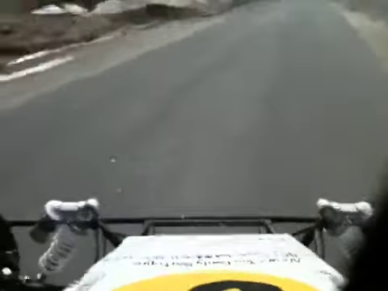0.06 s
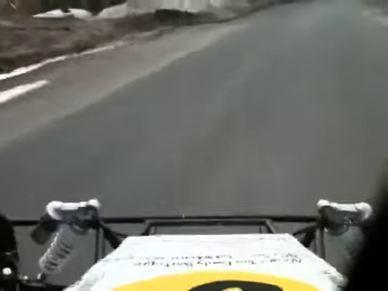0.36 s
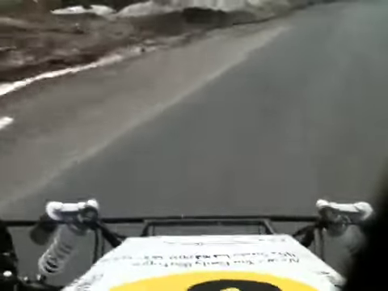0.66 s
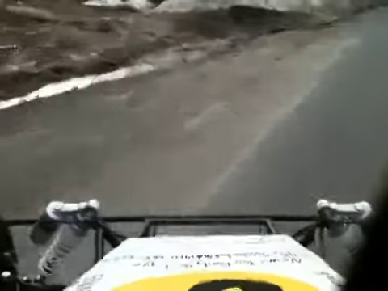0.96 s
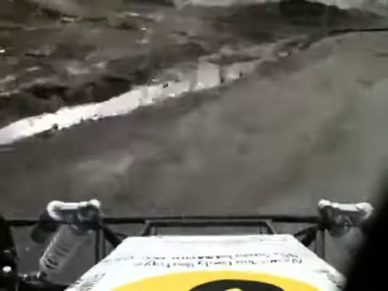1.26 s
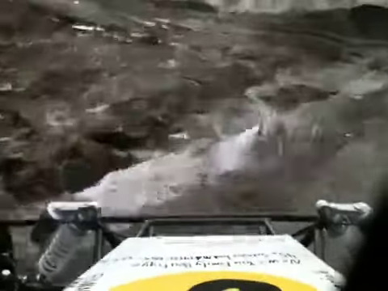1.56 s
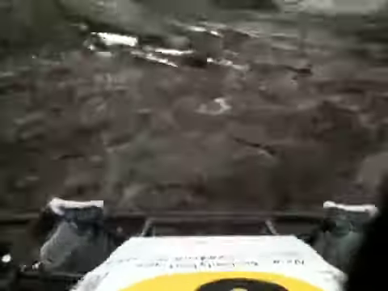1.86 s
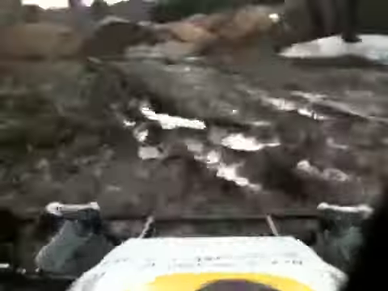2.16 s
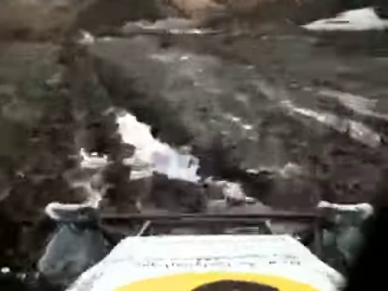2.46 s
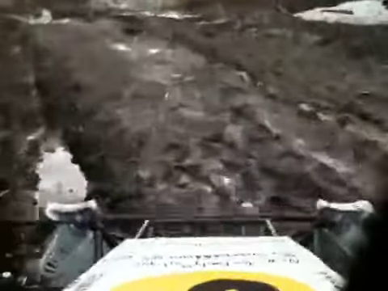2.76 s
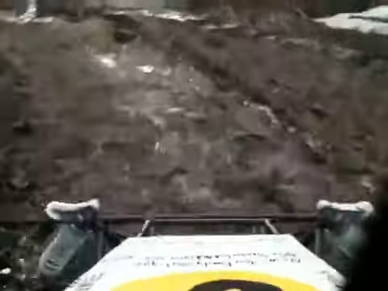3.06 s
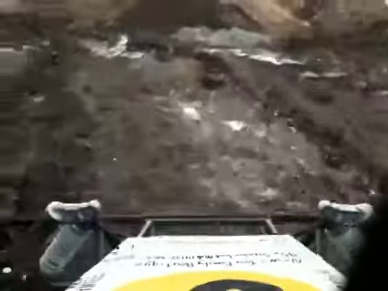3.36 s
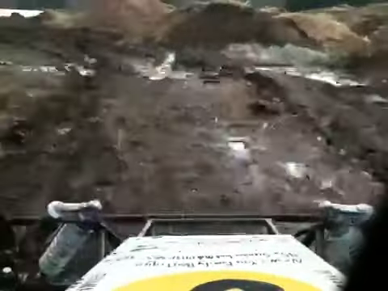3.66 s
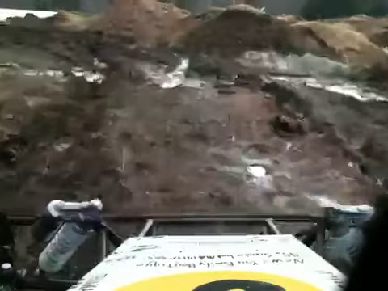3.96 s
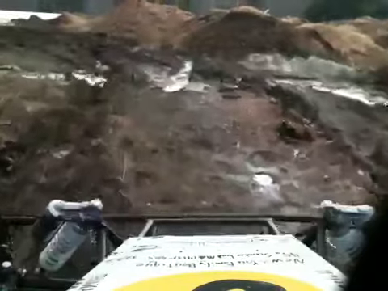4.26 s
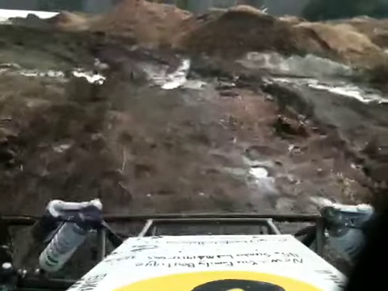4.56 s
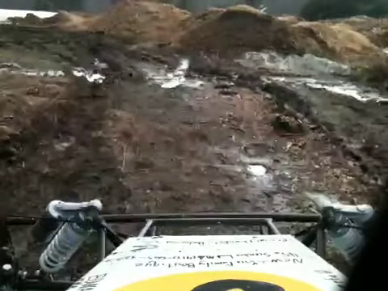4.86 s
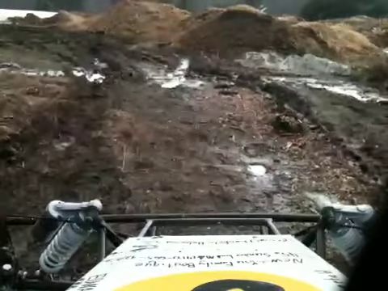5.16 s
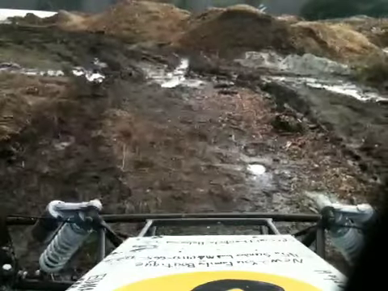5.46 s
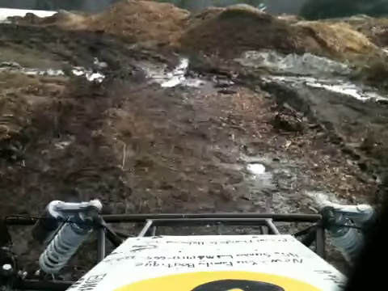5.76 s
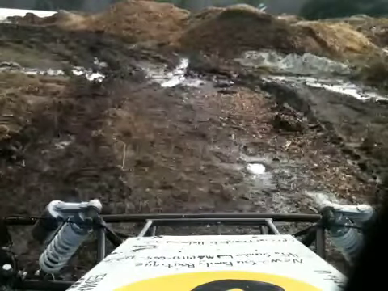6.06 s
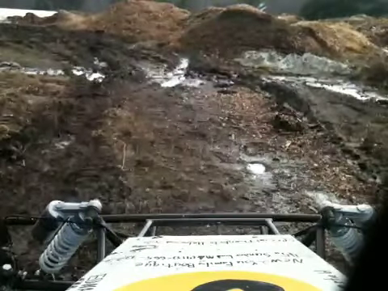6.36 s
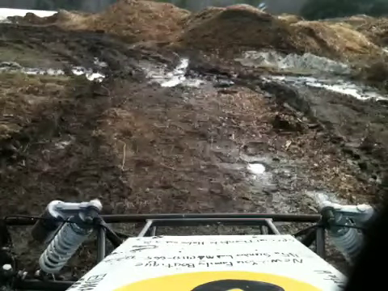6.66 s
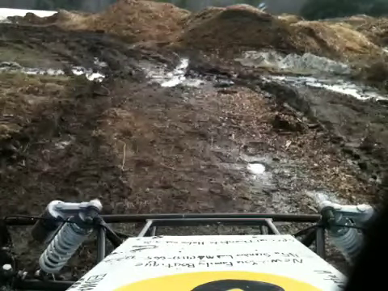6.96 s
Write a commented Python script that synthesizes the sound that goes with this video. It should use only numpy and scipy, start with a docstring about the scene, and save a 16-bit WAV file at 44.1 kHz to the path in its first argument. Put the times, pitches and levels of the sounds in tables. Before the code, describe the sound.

Heard from on board, an unpowered cart coasts down a road, wind buffeting the microphone with brief brake squeaks and a falling whistle. It runs onto wet dirt, where the tyres rumble, crunch grit and splash while the frame knocks and fittings rattle. It slows to a halt with faint mud pops. A lever clicks sharply twice, a sleeve rustles faintly and a light breeze puffs at the microphone.

```python
"""An unpowered cart coasts down a road: turbulence buffets the microphone on board, the brake squeaks
and air whistles over an edge, falling in pitch as the cart slows. It runs off onto wet dirt, where the
tyres rumble and throw grit and puddle water, and impacts ring the brake disc, frame and loose fittings.
Mud bubbles burst as it halts. At rest a lever ticks faintly, then clicks sharply twice, and a sleeve
rustles, while the eddies of a light breeze puff at the microphone."""
import sys
import numpy as np
from scipy.fft import rfft, irfft, next_fast_len
from scipy.io import wavfile
from scipy.ndimage import uniform_filter1d, map_coordinates

SR = 44100
rng = np.random.default_rng(int(sys.argv[2]) if len(sys.argv) > 2 else 0)


def unload_wav(signal):
    """Save mono or channel-first audio to the path in sys.argv[1] as 16-bit WAV at rate SR, clipped to [-1, 1]."""
    wavfile.write(
        sys.argv[1],
        SR,
        np.round(np.clip(np.atleast_2d(signal).T, -1, 1) * 32767).astype(np.int16),
    )


N = 309141

# airflow past the moving cart: (time [s], level [dB])
AIRFLOW = [(0, -18), (.055, -12.5), (.24, -19.5), (.37, -20), (.47, -19), (.72, -20.5), (.9, -19),
           (1.07, -22), (1.25, -22), (1.75, -23)]
# spectrum of turbulent pressure at the microphone: (frequency [Hz], level [dB])
BUFFET_SPECTRUM = [(25, -43.5), (50, -39), (90, -11.5), (140, 2), (210, 4), (320, -2.5), (480, -10),
                   (800, -31.5), (2000, -83.5)]
TEAR_GROWTH = 1.4  # dB of crackle per dB of flow strength


def amp(db):
    """Decibels to amplitude ratio."""
    return 10 ** (np.asarray(db) / 20)


def unit(x):
    """x at rms 1."""
    return x / np.sqrt(np.mean(x ** 2) + 1e-20)


def curve(rows):
    """Linear interpolation of (time [s], value) rows at every sample."""
    return np.interp(np.arange(N) / SR, *np.transpose(rows))


def level(rows, fade_s=0.4):
    """Gain from (time [s], level [dB]) rows, decaying exponentially outside their span."""
    t = np.arange(N) / SR
    outside = np.maximum(0, np.maximum(rows[0][0] - t, t - rows[-1][0]))
    return amp(curve(rows)) * np.exp(-outside / fade_s)


def spell(s, length, attack_s, release_s, sag_db_per_s=0):
    """An envelope that rises at time s, sags while it holds, then decays exponentially."""
    age = np.maximum(np.arange(N) / SR - s, 0)
    release = np.exp(-np.maximum(age - length, 0) / release_s)
    return np.minimum(age / attack_s, 1) * amp(-sag_db_per_s * age) * release


def wobble(rate):
    """A smooth random curve, rate knots a second."""
    knots = rng.standard_normal(int(N * rate / SR) + 4)
    return map_coordinates(knots, [np.arange(N) * rate / SR], mode="nearest")


def filtered(x, response):
    """Linear filtering: the spectrum of x times a frequency response."""
    size = next_fast_len(len(x) + 8192)
    return irfft(rfft(x, size) * response(np.fft.rfftfreq(size, 1 / SR)), size)[:len(x)]


def coloured(x, spectrum):
    """x filtered by (frequency [Hz], level [dB]) points joined on a log frequency axis."""
    points_hz, db = np.transpose(spectrum)
    return filtered(x, lambda hz: amp(np.interp(np.log(hz + 1), np.log(points_hz), db)))


def band(x, centre_hz, half_width_hz):
    """x through a bell-shaped (Lorentzian) passband."""
    return filtered(x, lambda hz: 1 / (1 + ((hz - centre_hz) / half_width_hz) ** 2))


def noise(spectrum):
    """Gaussian noise of the given spectrum, at rms 1."""
    return unit(coloured(rng.standard_normal(N), spectrum))


def narrowband(phase, half_width_hz):
    """Quadrature modulation: slow noise on a carrier gives a blurred tone."""
    i, q = (band(rng.standard_normal(N), 0, half_width_hz) for _ in range(2))
    return i * np.cos(phase) + q * np.sin(phase)


def grains(spectrum, rate, spread_db):
    """Shot noise: tiny random impacts, rate a second, at rms 1."""
    hit = rng.random(N) < rate / SR
    size = amp(spread_db * np.minimum(rng.standard_normal(N), 2))
    return unit(coloured(hit * size * rng.choice([-1, 1], N), spectrum))


def burst(t60):
    """Half a second of noise that decays by 60 dB in t60 seconds."""
    t = np.arange(SR // 2) / SR
    return rng.standard_normal(len(t)) * amp(-60 * t / t60)


def ring(modes, scatter_db, detune, waver):
    """Damped modes of loosely seated metal; each phase walks randomly by waver turns a sample."""
    out, t = np.zeros(SR // 4), np.arange(SR // 4) / SR
    for hz, db, t60 in modes:
        pitch_hz = hz * (1 + detune * rng.standard_normal())
        turns = pitch_hz * t + np.cumsum(waver * rng.standard_normal(len(t))) + rng.random()
        out += amp(db + scatter_db * rng.standard_normal() - 60 * t / t60) * np.sin(2 * np.pi * turns)
    return out


def peaked(x, db):
    """x scaled to a peak level."""
    return amp(db) * x / np.abs(x).max()


def add(track, s, sound):
    """Superpose a sound on the track at time s."""
    start = max(0, round(s * SR))
    track[start:start + len(sound)] += sound[:max(0, N - start)]


def evened(x, seconds):
    """x divided by its running rms, which levels the slow swells."""
    return x / np.sqrt(np.abs(uniform_filter1d(x ** 2, int(seconds * SR))) + 1e-9)


def swayed(x, share, rate):
    """Time warping: the resonances of x drift by a share of their pitch, rate times a second."""
    return map_coordinates(x, [np.arange(N) + np.cumsum(share * wobble(rate))], order=1, mode="mirror")


def still_air():
    """Stationary broadband noise is the faint outdoor background."""
    # ambient spectrum: (frequency [Hz], level [dB])
    spectrum = [(25, 0), (130, 19.5), (300, 9), (600, 8), (1200, 5), (2500, 0.5), (6000, -2), (11000, -5.5),
                (16000, -3)]
    return amp(-67.5) * noise(spectrum)


def breeze():
    """Intermittent turbulence: once the cart has slowed, the air flutters deeply and with gaps."""
    # strength of the flutter: (time [s], level [dB])
    strength = [(3.4, -48), (3.7, -56.5), (4.6, -56), (5.2, -66), (5.45, -53), (5.9, -51.5), (6.3, -55),
                (6.45, -44), (6.9, -52.5), (7.01, -66)]
    # its spectrum: (frequency [Hz], level [dB])
    spectrum = [(25, -44), (50, -39), (90, -3.5), (135, 2), (200, 0.5), (280, -7.5), (400, -19), (600, -29),
                (1500, -64.5)]
    lumps = amp(7.5 * wobble(45))
    return level(strength) * evened(noise(spectrum) * lumps, 0.16)


def puffs(cycles=0.47, wake_db=-19, wake_s=0.0083, rasp_db=-22):
    """A passing eddy is one pressure swing in a wake of weaker turbulence, raspier when strong."""
    # strongest eddies of the breeze: (time [s], level [dB], frequency [Hz])
    eddies = [(3.805, -33, 133.7), (3.912, -33.5, 129), (4.383, -36, 166.6), (4.412, -33.5, 137),
              (4.451, -36.5, 227), (4.609, -39, 143), (5.101, -36, 148), (5.12, -45, 127),
              (5.499, -35, 148), (5.612, -36.5, 177.9), (5.655, -35.5, 128.6), (5.776, -40, 141),
              (5.863, -30, 144), (5.933, -32, 188), (5.962, -30, 200.2), (5.991, -26.5, 179),
              (6.026, -36.5, 182), (6.053, -27.5, 133.8), (6.173, -35.5, 203), (6.393, -32, 240),
              (6.407, -28, 171.3), (6.418, -31.5, 161), (6.472, -28, 188.3), (6.482, -24, 200),
              (6.546, -37.5, 128.7), (6.596, -30, 167.6), (6.659, -34, 124), (6.795, -34.5, 143.3),
              (6.89, -35.5, 161.5)]
    out, wake, rasp = np.zeros((3, N))
    t = np.arange(-SR // 20, SR // 20) / SR
    strongest_db = max(db for s, db, hz in eddies)
    for (s, db, hz), turn in zip(eddies, rng.random(len(eddies))):
        swing = np.cos(2 * np.pi * (hz * t + turn)) / np.cosh(2 * hz * t / cycles)
        swell = np.exp(-(t / wake_s) ** 2)
        add(out, s + t[0], amp(db) * swing)
        add(wake, s + t[0], amp(db + wake_db) * swell)
        add(rasp, s + t[0], amp(strongest_db + rasp_db + TEAR_GROWTH * (db - strongest_db)) * swell)
    # the microphone sheds the deep bass
    swings = coloured(out, [(30, -36.5), (70, -7.5), (140, 5.5), (600, -5.5)])
    wake *= noise(BUFFET_SPECTRUM)
    rasp *= noise([(150, 0.5), (380, 12), (700, -8.5), (1400, -37.5)])
    return swings + wake + rasp


def driver():
    """Friction noise: a sleeve rubs with a thin hiss and the seat shifts softly."""
    # rustle of the sleeve: (time [s], level [dB])
    rustle = [(6.1, -91.5), (6.2, -63.5), (6.37, -62.5), (6.4, -59.5), (6.47, -65), (6.54, -63),
              (6.65, -66.5), (6.76, -84.5)]
    # shifts of the seat: (time [s], level [dB])
    shifts = [(6.389, -52), (6.432, -60.5), (6.525, -56.5)]
    shifting = sum(amp(db) * spell(s, 0.0065, attack_s=0.0061, release_s=0.022) for s, db in shifts)
    seat = noise([(200, -8.5), (700, 6), (1100, -4.5), (1700, 0), (2700, -7.5), (3800, -1.5),
                  (6000, -14), (12000, -23)])
    cloth = grains([(1500, -5.5), (3200, -9.5), (5500, -4.5), (8000, -5.5), (11000, -11.5),
                    (16000, -12)], rate=7200, spread_db=2)
    return level(rustle) * cloth + shifting * seat


def frame(force):
    """Modal superposition: the tube frame responds as damped resonators of alternating sign."""
    # frame modes: (frequency [Hz], bandwidth [Hz], level [dB])
    modes = [(322, 76, 3.5), (442, 130, -0.5), (660, 70, -4), (1140, 150, -8), (1530, 140, -11.5)]
    return filtered(force, lambda hz: sum(
        (-1) ** k * amp(db) * 1j * hz * width / (centre ** 2 - hz ** 2 + 1j * hz * width)
        for k, (centre, width, db) in enumerate(modes)))


def lever():
    """Impulsive excitation: the lever clicks with a short rattle, and the frame rings on."""
    # lever clicks: (time [s], peak level [dB])
    clicks = [(5.008, -48), (5.3307, -26.5), (5.3914, -25)]
    # spectrum of a click: (frequency [Hz], level [dB])
    spectrum = [(400, -32), (700, -14), (1100, -10), (1500, -5), (2000, -9), (2700, -11), (3700, .5),
                (4800, -2.5), (6500, -5), (9000, -8.5), (13000, -16), (16000, -29)]
    out, shake = np.zeros((2, N))
    for s, db in clicks:
        click = coloured(burst(t60=0.019) + amp(-9) * burst(t60=0.063), spectrum)
        add(out, s, peaked(click, db))
        add(shake, s, amp(db - 5) * burst(t60=0.254))
    return out + frame(shake)


def squelches(t60=0.025, cycles=60, rise_per_s=8):
    """Bubble resonance: mud bubbles pop and ring with rising pitch, the big, low ones longest."""
    # bubbles under the halting tyres: (time [s], level [dB], frequency [Hz])
    bubbles = [(3.688, -44.5, 2220), (3.858, -49, 1850), (3.951, -50, 2300), (4.101, -43.5, 1010),
               (4.136, -56, 1300)]
    out, t = np.zeros(N), np.arange(SR // 10) / SR
    for s, db, hz in bubbles:
        pop = band(burst(t60), hz, half_width_hz=hz / 4)
        chirp = np.sin(2 * np.pi * hz * t * (1 + rise_per_s * t / 2))
        add(out, s, peaked(pop, db))
        add(out, s, 0.5 * amp(db - 60 * hz * t / cycles) * chirp)
    return out


def squeaks():
    """Sliding friction excites high, breathy resonances as the brake brushes its disc."""
    # brake contacts: (time [s], duration [s], level [dB])
    contacts = [(0.622, .026, -42.5), (0.77, .03, -44.5), (0.809, 0.019, -44.5)]
    # spectrum of a squeak: (frequency [Hz], level [dB])
    spectrum = [(3000, -30), (4700, -12), (5400, 0), (6200, -14), (7100, -3), (7800, -14), (8650, 1),
                (9400, -20), (10400, -10), (11200, -20), (12100, -12), (14000, -28)]
    touch = sum(amp(db) * spell(s, length, attack_s=0.0053, release_s=0.014)
                for s, length, db in contacts)
    return touch * noise(spectrum)


def disc():
    """Beating: two close modes roughen the brake disc's chinks as the cart leaves the road."""
    # blows on the disc: (time [s], level [dB])
    blows = [(1.4, -44.5), (1.615, -40), (1.796, -26), (1.87, -33), (1.904, -22.5), (1.93, -22),
             (1.945, -30)]
    # disc modes: (frequency [Hz], level [dB], t60 [s])
    modes = [(4950, -12, .13), (6230, -8, .13), (6868, -2, .14), (7113, 0, .15)]
    out = np.zeros(N)
    for s, db in blows:
        add(out, s, amp(db) * ring(modes, scatter_db=1.5, detune=0.0005, waver=0.007))
    return out


def clinks():
    """Modal overlap: the close modes of a loose fitting merge into one jingling band."""
    # blows on fittings: (time [s], peak level [dB], centre frequency [Hz], t60 [s])
    blows = [(0.371, -23.5, 3466, 0.15), (4.21, -40.5, 3620, 0.013)]
    out = np.zeros(N)
    for s, db, centre_hz, t60 in blows:
        jingle = band(burst(t60), centre_hz, half_width_hz=330)
        add(out, s, peaked(jingle, db))
    return out


def rattle(tap_db=1):
    """Line broadening: jolted fittings chafe in their seats, so their modes blur into a dull clatter."""
    # jolts on the rough dirt: (time [s], level [dB])
    jolts = [(2.1346, -31.5), (2.215, -29), (2.3144, -37), (2.391, -27.5), (2.426, -28.5), (2.4892, -36.5),
             (2.5188, -32), (2.6072, -34), (2.7536, -31.5), (2.805, -29.5), (2.8563, -27), (2.886, -30.5),
             (2.921, -32.5)]
    # modes of the fittings: (frequency [Hz], level [dB], t60 [s])
    modes = [(2350, -7, .06), (2690, -2, .1), (2940, -7, .06), (3400, -5, .06), (3690, -4, .08)]
    out = np.zeros(N)
    for s, db in jolts:
        add(out, s, amp(db) * ring(modes, scatter_db=2, detune=0.008, waver=0.016))
        tap = coloured(burst(t60=0.03), [(800, -17), (2500, 7), (4200, 2.5), (9000, -11)])
        add(out, s, amp(db + tap_db) * tap)
    return out


def knocks(octaves=0.64):
    """Impact noise: each stone or jolt clacks around its own pitch and excites the frame's modes."""
    # impacts: (time [s], peak level [dB], centre frequency [Hz], t60 [s])
    impacts = [(0.373, -27, 4486, 0.056), (1.7935, -9.5, 6467, .033), (1.7988, -11.5, 6740, 0.025),
               (1.901, -11.5, 6900, 0.045), (2.2149, -11.5, 4147, 0.03), (2.261, -12, 4900, 0.017),
               (2.315, -14, 3486, .02), (2.5175, -21, 2990, 0.032), (2.9585, -15.5, 7740, 0.005),
               (3.1552, -14, 2718, 0.011), (3.277, -15.5, 7160, 0.042), (3.2937, -26.5, 971, 0.066),
               (3.819, -33.5, 7420, 0.019)]
    out, shake = np.zeros((2, N))
    for s, db, centre_hz, t60 in impacts:
        clack = filtered(burst(t60), lambda hz: 1 / (1 + (np.log2((hz + 1) / centre_hz) / octaves) ** 2))
        add(out, s, peaked(clack, db))
        add(shake, s, amp(db + 2) * burst(t60))
    return out + frame(shake)


def panel_boom(pitch_hz=700, flex_hz=30):
    """Plate resonance: the body panel's hollow note wavers as it flexes, at rms 1."""
    phase = 2 * np.pi * np.cumsum(pitch_hz + flex_hz * wobble(14)) / SR
    return evened(narrowband(phase, half_width_hz=100), 0.04)


def ticks(rate, centre_hz, octaves, cycles, spread_db):
    """Damped oscillators: stones or droplets each ring briefly at their own pitch, at rms 1."""
    draw = rng.standard_normal((int(rate * N / SR), 2))
    start = rng.integers(0, N, len(draw))[:, None]
    hz = np.clip(centre_hz * 2 ** (octaves * draw[:, :1]), 600, 14000)
    size = amp(spread_db * np.minimum(draw[:, 1:], 2))
    n = np.arange(SR // 55)
    turns = hz * n / SR
    rings = size * np.sin(2 * np.pi * turns) * np.exp(-turns / cycles)
    return unit(np.bincount((start + n).ravel(), rings.ravel())[:N])


def thrown_matter(rolling, grit_db=-5.5, spray_db=-1.5, road_hiss_db=-28):
    """Incoherent sources add in power: the envelopes of grit and of spray off the treads."""
    # looser, wetter ground away from the road: (time [s], level relative to rolling [dB])
    looseness = [(1.65, -13.5), (2.05, -5.5), (2.45, 0.5), (3.8, 3.5)]
    # wet ruts: (time [s], duration [s], water level [dB], grit level [dB])
    ruts = [(1.76, 0.14, -33.5, -32), (1.84, 0.1, -27, -30), (1.858, 0.08, -26.5, -26),
            (2.096, 0.096, -33, -30.5), (2.2, 0.027, -26, -30), (2.637, 0.0067, -32, -42),
            (2.754, 0.19, -33, -31), (2.999, 0.125, -27.5, -31.5), (3.01, .02, -27, -37),
            (3.292, 0.0092, -24.5, -23), (3.335, .015, -50, -34.5), (3.466, 0.021, -40, -47.5)]
    thrown = rolling * amp(curve(looseness))
    road_hiss = amp(road_hiss_db) * level(AIRFLOW)
    verge_sand = amp(-44.5) * spell(1.25, length=0.35, attack_s=0.12, release_s=0.05)
    grit = amp(grit_db) * thrown
    spray = np.sqrt((amp(spray_db) * thrown) ** 2 + road_hiss ** 2 + verge_sand ** 2)
    for s, length, water_db, rut_grit_db in ruts:
        splash = spell(s, length, attack_s=0.0032, release_s=0.03, sag_db_per_s=33)
        spray = np.hypot(spray, amp(water_db) * splash)
        grit = np.hypot(grit, amp(rut_grit_db) * splash)
    return grit, spray


def tyres(rumble_db=-0.5, drone_db=-6):
    """Forced vibration: bumps drive the hollow tyres and body panel, crush grit and fling spray."""
    # rolling on dirt, nearly halting, then settling with a brief last stir: (time [s], level [dB])
    roll = [(1.58, -29.5), (2.15, -25.5), (2.57, -35.5), (2.85, -35), (3.25, -37.5), (3.48, -42.5),
            (3.67, -52.5), (3.85, -53), (4.17, -64.5), (4.3, -77), (4.42, -65.5), (4.71, -58), (4.8, -67.5),
            (5.0, -77)]
    # humps in the ground: (time [s], tyre thud level [dB], panel boom level [dB])
    humps = [(1.854, -21, -29), (2.136, -22.5, -42), (2.235, -31, -34), (2.405, -39.5, -30),
             (2.46, -43, -42), (2.66, -36, -37), (2.8, -30.5, -34.5), (2.864, -40, -40), (3.06, -41.5, -39),
             (3.43, -38.5, -54)]
    # spectra of tyre, panel, grit and spray: (frequency [Hz], level [dB])
    tyre_spectrum = [(25, -52), (60, -34), (120, -11), (200, -3.5), (260, -1.5), (305, 2.5), (360, -2),
                     (450, -11), (600, -25), (1500, -55)]
    panel_spectrum = [(250, -32.5), (400, -5), (480, .5), (570, -4), (650, -1), (700, .5), (800, -2),
                      (880, -9), (1060, -10), (1200, -16), (2500, -44)]
    grit_spectrum = [(400, -26.5), (900, 5), (1600, 7), (2400, 0), (3600, -11.5), (5000, -13), (9000, -5.5)]
    spray_spectrum = [(1500, -10.5), (3500, 0.5), (5000, -0.5), (7000, -0.5), (9000, -5), (12000, -10),
                      (16000, -17.5)]
    bumps = wobble(40)
    rumble = evened(swayed(noise(tyre_spectrum), share=0.07, rate=9) * amp(2 * bumps), 0.053)
    drone = evened(swayed(noise(panel_spectrum), share=0.05, rate=9) * amp(2.5 * bumps), 0.14)
    stones = ticks(rate=260, centre_hz=3100, octaves=0.4, cycles=22, spread_db=5)
    crushing = grains(grit_spectrum, rate=3000, spread_db=0) * amp(1.5 * bumps)
    crunch = evened(crushing + 0.55 * stones, 0.5)
    drops = ticks(rate=450, centre_hz=7200, octaves=0.42, cycles=28, spread_db=5)
    mist = grains(spray_spectrum, rate=12000, spread_db=3)
    fizz = unit(mist + 0.46 * drops) * amp(2.1 * bumps + 0.5 * wobble(150))
    rolling = level(roll, fade_s=0.047)
    grit, spray = thrown_matter(rolling)
    thuds, booms = np.zeros((2, N))
    for s, thud_db, boom_db in humps:
        jolt = spell(s, length=0.048, attack_s=0.0063, release_s=0.02)
        thuds += amp(thud_db) * jolt
        booms += amp(boom_db) * jolt
    tyre_drive = np.hypot(amp(rumble_db) * rolling, thuds)
    panel_drive = np.hypot(amp(drone_db) * rolling, amp(-6) * grit)  # flung grit drums on it too
    body = tyre_drive * rumble + panel_drive * drone + booms * panel_boom()
    return body + grit * crunch + spray * fizz


def whistle(eddies):
    """Edge tone: a narrow core, a fuzzy skirt and a lower resonance all sink with the airspeed."""
    # pitch of the edge tone: (time [s], frequency [Hz])
    pitch = [(.73, 2180), (.79, 2380), (.89, 2230), (.93, 2290), (1.03, 2060), (1.21, 2070), (1.26, 1910),
             (1.38, 1880), (1.415, 2000), (1.45, 1790), (1.6, 1720)]
    # spells of whistling: (time [s], duration [s], level [dB])
    spells = [(0.726, 0.029, -30.5), (0.771, 0.385, -24.5), (1.215, 0.0059, -22), (1.231, 0.16, -24),
              (1.408, 0.0048, -28.5), (1.452, 0.05, -36), (1.59, 0.042, -42)]
    pitch_hz = curve(pitch)
    phase = 2 * np.pi * np.cumsum(pitch_hz + 22 * wobble(70)) / SR
    core = evened(unit(narrowband(phase, half_width_hz=55)), 0.022)
    roughness = 0.92 * (pitch_hz / 2050) ** 2  # faster air blows a rougher tone
    skirt = roughness * unit(narrowband(phase, half_width_hz=350))
    lower = amp(-2) * unit(narrowband(0.62 * phase, half_width_hz=150))
    sputtering = core * amp(1.5 * eddies) + (skirt + lower) * amp(3.2 * eddies)
    blowing = sum(amp(db) * spell(s, length, attack_s=0.0031, release_s=0.018, sag_db_per_s=12.5)
                  for s, length, db in spells)
    return blowing * evened(sputtering, 0.04)


def wind(tear_db=-25.5, reference_db=-18.5, lull_db=-5.5, surge_s=0.011, low_cut_hz=55):
    """Turbulent pressure: eddies buffet the microphone, tear into crackle and stir the edge tone."""
    # spectrum of the tearing flow: (frequency [Hz], level [dB])
    tear_spectrum = [(40, -52), (150, -19), (400, -2), (720, 1.5), (1050, -3.5), (1500, -12.5), (2200, -19),
                     (3000, -35), (6000, -50)]
    # hard gusts: (time [s], level [dB], duration [s])
    gusts = [(0, -19.5, 0.09), (0.07, -23.5, 0.046), (0.121, -15.5, 0.0055), (0.142, -11.5, 0.012),
             (0.157, -21.5, 0.037), (.26, -16.5, 0.018), (0.302, -20, 0.011), (0.333, -21.5, 0.018),
             (0.415, -22, 0.013), (0.451, -27.5, 0.025), (0.505, -22.5, 0.0044), (0.554, -22, 0.023),
             (0.597, -13, 0.0042), (0.635, -18.5, 0.035), (.679, -18, 0.017), (0.777, -19, 0.0056),
             (0.842, -18, 0.0039), (0.878, -16, 0.0053), (0.962, -19.5, 0.015), (1.12, -19, 0.016),
             (1.138, -16, 0.0093), (1.247, -17, 0.0043), (1.37, -21, 0.007), (1.497, -20.5, .011),
             (1.521, -24.5, 0.031), (1.593, -17.5, 0.012), (1.62, -24, 0.017), (1.693, -21.5, 0.0045)]
    # lulls in the tearing: (time [s], duration [s])
    lulls = [(0.103, .04), (0.2, 0.092), (0.313, 0.11), (0.503, 0.031), (0.564, 0.02), (0.707, 0.038),
             (1.142, .058), (1.418, .06), (1.628, 0.15)]
    # surges and stalls of the deep buffeting: (time [s], level change [dB])
    surges = [(.18, 4), (.252, -5.5), (.355, -7), (.405, -5.5), (.468, 3), (.525, -2.5), (0.784, 5),
              (.83, 1), (.897, 5), (.97, 5.5), (1.19, 4.5), (1.215, 0), (1.245, 8.5), (1.39, -2.5)]
    eddies = wobble(170)
    buffet = evened(noise(BUFFET_SPECTRUM) * amp(2 * eddies), 0.03)
    crackle = evened(grains(tear_spectrum, rate=2500, spread_db=3) * amp(2.5 * eddies), 0.06)
    t, gusting = np.arange(N) / SR, np.zeros(N)
    for s, db, length in gusts:
        age = np.maximum(t - s, 0) / length
        gusting += amp(db) * (1 - np.exp(-22 * age)) * np.exp(-2 * age ** 2)  # hits fast and ebbs
    strength = level(AIRFLOW)
    lull = sum(spell(s, length, attack_s=0.003, release_s=0.0062) for s, length in lulls)
    tearing = amp(tear_db + lull_db * lull + 1.8 * wobble(55))
    tearing *= (strength / amp(reference_db)) ** TEAR_GROWTH
    surge_db = sum(db * np.exp(-((t - s) / surge_s) ** 2) for s, db in surges)
    rush = evened(noise(tear_spectrum), 0.0051)
    flow = strength * amp(surge_db - 0.43) * buffet + tearing * crackle + gusting * rush
    return filtered(flow, lambda hz: hz ** 2 / (hz ** 2 + low_cut_hz ** 2)) + whistle(eddies)


def scene():
    """Superposition: the pressures of cart and air add at one microphone."""
    cart = tyres() + squelches() + rattle() + squeaks() + knocks() + clinks() + disc()
    at_rest = lever() + driver()
    return (wind() + breeze() + puffs() + cart + at_rest + still_air())[None]


def record(dry, ceiling=0.62, top_hz=16000):
    """Soft saturation rounds the highest peaks, and a low-pass filter limits the band."""
    rounded = dry[0] / (1 + np.abs(dry[0] / ceiling) ** 6) ** (1 / 6)
    return filtered(rounded, lambda hz: hz < top_hz)[None]


dry = scene()
out = record(dry)
unload_wav(out)
```